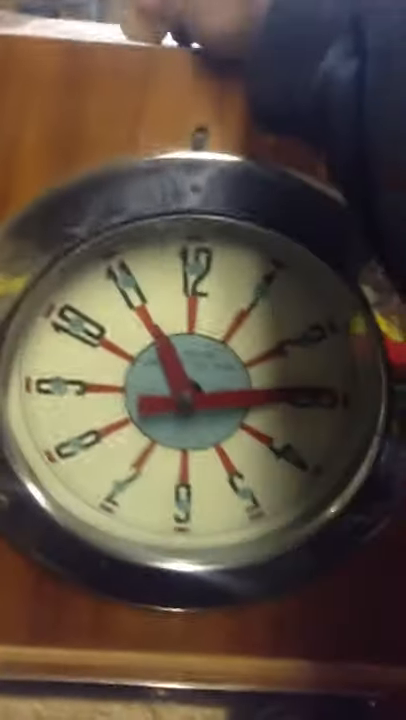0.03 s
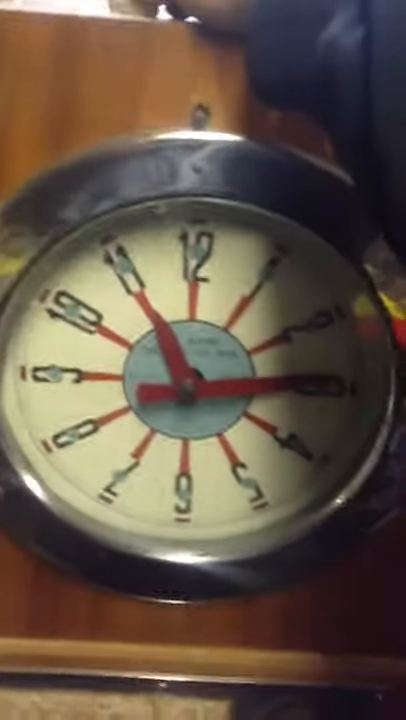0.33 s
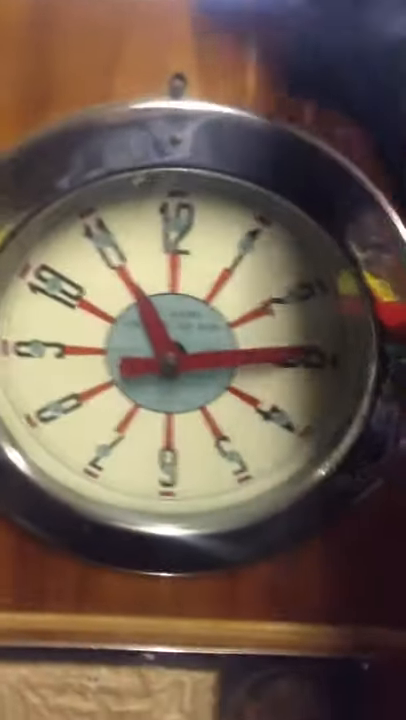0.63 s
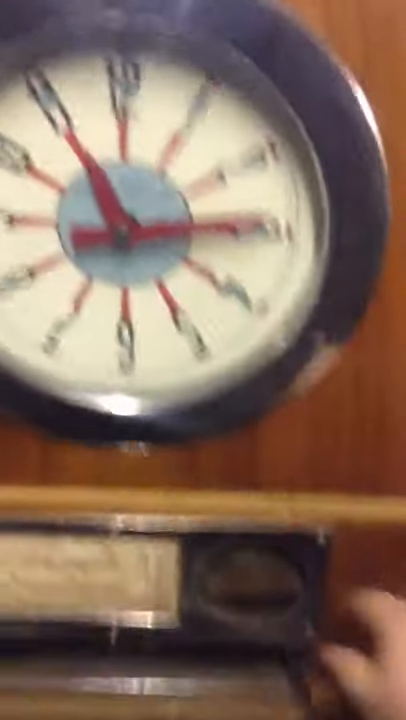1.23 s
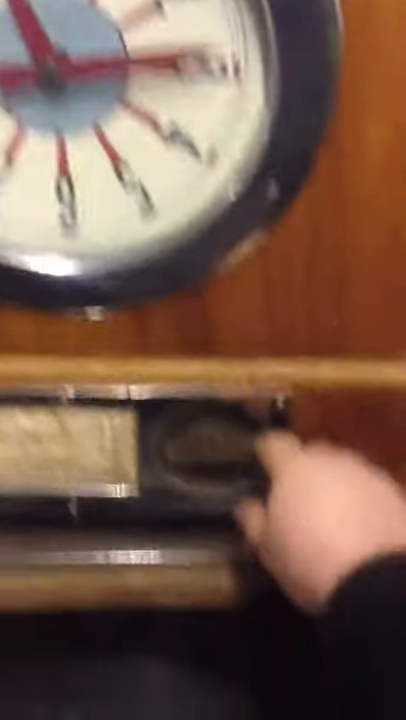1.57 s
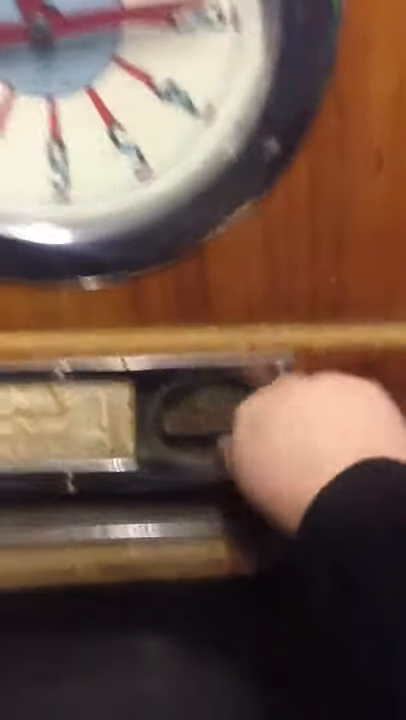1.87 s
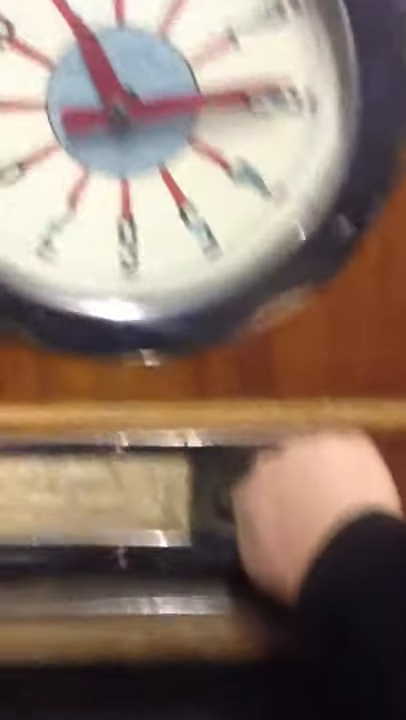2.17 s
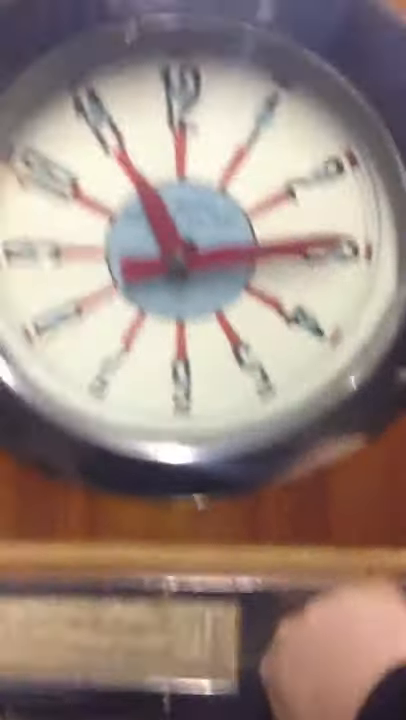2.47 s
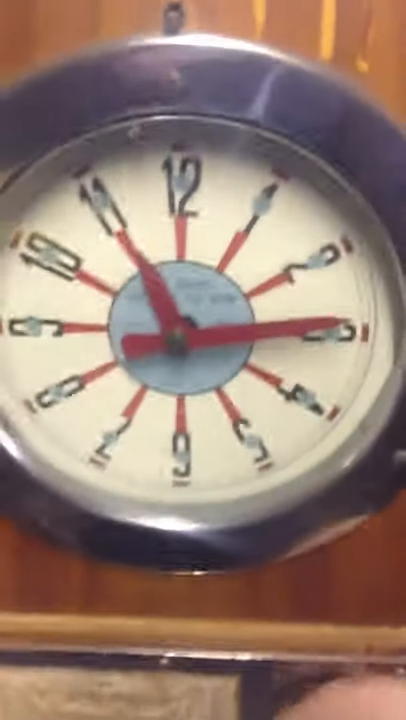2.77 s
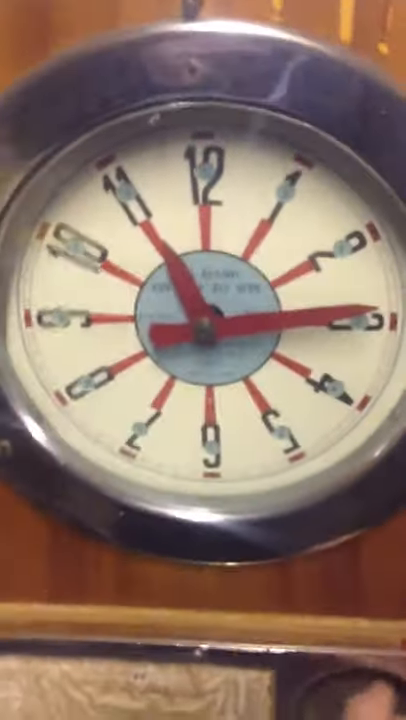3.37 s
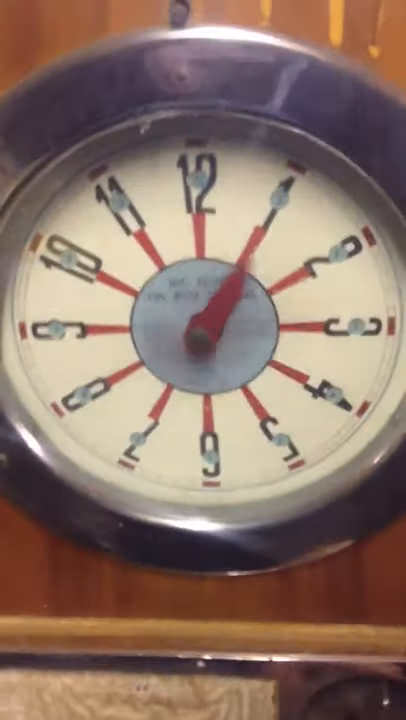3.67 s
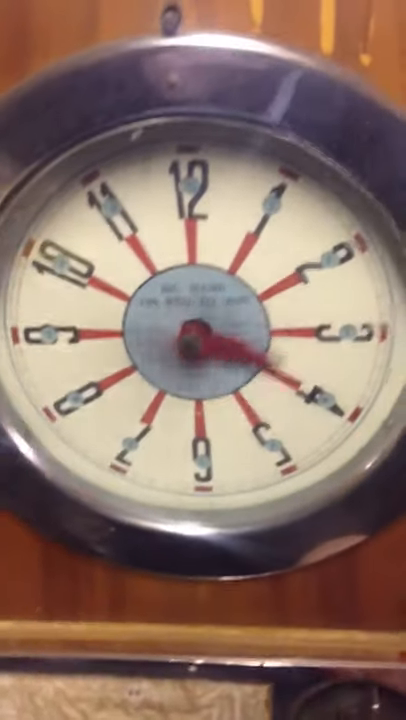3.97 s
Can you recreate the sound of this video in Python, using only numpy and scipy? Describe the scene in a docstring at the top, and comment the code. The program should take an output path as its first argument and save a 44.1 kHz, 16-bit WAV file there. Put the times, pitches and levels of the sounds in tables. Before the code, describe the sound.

Metallic clatter comes from a wooden coin machine, heard up close in a hard room. First a coin drops and scrapes down inside; then latches click, levers thump the cabinet and gears rattle with brief, thin squeals.

```python
"""A hard, quiet room, one microphone close to an old wooden coin machine with a clock face.
A sleeve brushes the case; a coin drops in, strikes the chute and slides down it. A knob is turned:
latches click, levers clunk in the cabinet, a spring rings and gears rattle the hand into a spin.
Rubbing metal squeals briefly, and the bare room prolongs the sounds."""
import sys
import numpy as np
from scipy import signal
from scipy.fft import rfft, irfft
from scipy.io import wavfile

SR = 44100
rng = np.random.default_rng(int(sys.argv[2]) if len(sys.argv) > 2 else 0)


def wav_record(signal):
    """Record a signal, one row per channel, as 16-bit PCM in the file named by sys.argv[1]."""
    frames = np.transpose(np.atleast_2d(signal))
    bounded = np.clip(frames, -1, 1)
    # unit amplitude maps onto the largest positive 16-bit level
    quanta = np.round(bounded * 32767).astype(np.int16)
    wavfile.write(sys.argv[1], SR, quanta)


N = 176400
T = np.arange(SR) / SR  # one second, the span of a single event
METAL_DIRECT, WOOD_DIRECT = 2.7, 7.1  # gain of the direct path to the microphone
COIN_CHATTER_S, LEVER_CHATTER_S = 0.0062, 0.0098  # decay of the rebounds after a contact
CABINET_T60_S, SPRING_T60_S, CHUTE_T60_S, WHEEL_T60_S = 0.56, 0.23, 0.36, 0.74
PEAKY_DB, PEAK_WIDTH_HZ = 2.5, 110  # the many small resonances of sheet metal


def amp(db):
    """Decibels to gain."""
    return 10 ** (np.asarray(db) / 20)


def unit(x):
    """Scales to energy 1."""
    return x / (np.linalg.norm(x) + 1e-20)


def unit_rms(x):
    """Scales to rms 1."""
    return unit(x) * np.sqrt(x.size)


def value_at(points, hz):
    """Interpolates a table on a log-frequency axis."""
    f, value = np.transpose(points)
    return np.interp(np.log(hz + 1), np.log(f + 1), value)


def add(mix, s, sound):
    """Mixes a sound in at s seconds."""
    part = mix[max(round(s * SR), 0):][:len(sound)]
    part += sound[:len(part)]


def through(x, response):
    """Convolves, keeping the length."""
    return signal.fftconvolve(x, response)[:len(x)]


def colour(spectrum, peaky_db=0, size=4096):
    """Minimum-phase filter of energy 1; peaky_db adds small random resonances to the spectrum."""
    hz = abs(np.fft.fftfreq(size, 1 / SR))
    peaks = np.interp(hz / PEAK_WIDTH_HZ, np.arange(size), rng.standard_normal(size))
    log_gain = np.log(amp(value_at(spectrum, hz) + peaky_db * peaks))
    response = np.exp(np.conj(signal.hilbert(log_gain)))
    return unit(np.fft.ifft(response).real)


def drift(n, hz):
    """Smooth random wander of rms 1, mostly slower than hz."""
    rolloff = (1 + (np.fft.rfftfreq(n, 1 / SR) / hz) ** 2) ** 2
    return unit_rms(irfft(rfft(rng.standard_normal(n)) / rolloff, n))


# reverberation of the room around the machine: f/Hz, t60/s
ROOM_DECAY = [(150, 0.53), (500, 0.42), (1500, 0.37), (3000, 0.4), (7000, 0.32), (14000, 0.35)]
def echoes(build_s=.02, first_density=.15):
    """Reflections in case and room: sparse at first, then dense, each band dying at its own speed."""
    density = np.clip(first_density * (1 + (T / build_s) ** 2), .01, 1)
    taps = rng.standard_normal(SR) * (rng.random(SR) < density) / np.sqrt(density)
    hz, t, bands = signal.stft(taps, SR, nperseg=256)
    decay = amp(-60 * t / value_at(ROOM_DECAY, hz)[:, None])
    return signal.istft(bands * decay, SR, nperseg=256)[1][:SR]


def modes(table, t60, rise_s, blur, blur_hz):
    """Dying partials, each made uneven by reflections."""
    out = np.zeros(SR)
    for hz, db in table:
        partial = np.exp(2j * np.pi * (hz * T + rng.random()))
        flutter = 1 + blur * (drift(SR, blur_hz) + 1j * drift(SR, blur_hz))
        out += amp(db) * (partial * flutter).real
    onset = 1 - np.exp(-(T / rise_s) ** 2)
    return out * onset * amp(-60 * T / t60)


def steel(table, t60):
    """A steel part rings with strongly fluttering modes."""
    return modes(table, t60, rise_s=0.0062, blur=0.56, blur_hz=40.3)


def settle(hold_s, tail_db):
    """Envelope of wood that shudders briefly, then leaves a weaker tail."""
    return amp(tail_db) + (1 - amp(tail_db)) * np.exp(-(T / hold_s) ** 2)


def strike(tone, chatter_s, direct, echo_shape=1, rebounds_per_s=500):
    """One contact and its quick rebounds, coloured by the part that is hit."""
    rebounds = 0.54 * rng.standard_normal(SR) * (rng.random(SR) < rebounds_per_s / SR)
    clicks = rebounds * np.exp(-T / chatter_s)
    clicks[0] = 1
    path = echoes() * echo_shape
    path[0] += direct
    return through(path, signal.fftconvolve(unit(clicks[:SR // 8]), tone))


def rub(curve, spectrum, per_s, spread_db, wet, ring=None):
    """Tiny uneven impacts under a level curve, heard in the room; they may set a part ringing."""
    impacts = rng.choice([-1, 1], N) * (rng.random(N) < per_s / SR)
    sizes = amp(spread_db * np.minimum(rng.exponential(1, N), 4))
    level_db = np.interp(np.arange(N) / SR, *np.transpose(curve), left=-120, right=-120)
    force = unit_rms(impacts * sizes) * amp(level_db)
    direct = through(force, colour(spectrum, PEAKY_DB))
    out = (direct + wet * through(direct, unit(echoes()))) / np.hypot(1, wet)
    return out if ring is None else out + through(force, ring)


# room tone at the microphone: f/Hz, relative level/dB
AIR_SPECTRUM = [(90, -19.5), (150, -2), (300, -4), (700, -13.5), (1700, -18), (2800, -25), (7500, -25.5),
                (10000, -36), (14500, -26.5)]
def air(level_db=-62.5):
    """The room's air rumbles low, with a faint hiss."""
    gain = amp(level_db + 0.4 * drift(N, 4.3))
    return gain * through(rng.standard_normal(N), colour(AIR_SPECTRUM))


# sleeve on the case, barely above the room tone: t/s, level/dB
SLEEVE_CURVE = [(0, -77), (.19, -65.5), (.3, -77.5), (1.9, -74.5), (2.1, -64), (2.3, -78)]
# cloth rustle: f/Hz, relative level/dB
SLEEVE_SPECTRUM = [(100, -19), (400, 1), (3200, -2), (4800, 0), (7500, -4.5), (10000, -17)]
def sleeve():
    """Cloth brushes the machine twice in a fine stream of tiny contacts."""
    return rub(SLEEVE_CURVE, SLEEVE_SPECTRUM, per_s=2500, spread_db=-2.5, wet=0.63)


# modes of the wooden cabinet: f/Hz, relative level/dB
CABINET_MODES = [(168, -22), (205, -3), (371, -19), (457, -13.5), (666, -34)]
def thump():
    """The cabinet's low modes swell and settle."""
    ring = modes(CABINET_MODES, CABINET_T60_S, rise_s=0.0078, blur=0.4, blur_hz=22.6)
    return settle(hold_s=0.027, tail_db=-11) * ring


# struck wood, heard close: f/Hz, relative level/dB
CLACK_SPECTRUM = [(110, -41.5), (190, 2.5), (280, -6.5), (390, 2), (620, -2.5), (900, -3), (1700, -12),
                  (3500, -28), (12000, -35.5)]
def clack(chatter_s):
    """A contact rattles the wooden panels, which quickly settle."""
    shudder = settle(hold_s=0.016, tail_db=-6.5)
    return strike(colour(CLACK_SPECTRUM), chatter_s, WOOD_DIRECT, shudder)


# latches and levers inside the case, and at 2.1 s a faint tick of a hand on the knob: t/s, thump level/dB,
# clack level/dB, metal level/dB
LEVER_BLOWS = [(.077, -77, -47.5, -72), (2.097, -73, -57, -69), (2.702, -38, -43.5, -44.5),
               (2.812, -34.5, -49, -46.5), (2.885, -26, -32.5, -30.5), (2.957, -26.5, -39.5, -79),
               (3.107, -47, -46.5, -47), (3.158, -25, -25, -33), (3.165, -20, -20, -25.5),
               (3.18, -25, -27, -25.5), (3.277, -22.5, -21, -30), (3.294, -28, -20, -23),
               (3.3575, -33, -17, -27.5), (3.371, -31, -18, -24.5), (3.391, -41, -18.5, -22),
               (3.502, -5.5, -28, -21.5), (3.566, -10.5, -24, -18), (3.646, -20, -28, -24.5),
               (3.857, -38, -26, -31), (3.87, -31, -33, -36)]
# struck steel linkage: f/Hz, relative level/dB
METAL_SPECTRUM = [(150, -37), (1000, -15), (2200, -0.5), (3300, -5.5), (4600, -1), (8200, -2), (9700, -17),
                  (13000, -13), (15500, -28)]
def levers():
    """Each blow thumps the cabinet, clacks its panels and jangles a different steel part."""
    out = np.zeros(N)
    for s, thump_db, clack_db, metal_db in LEVER_BLOWS:
        add(out, s, amp(thump_db) * thump())
        add(out, s, amp(clack_db) * clack(LEVER_CHATTER_S))
        jangle = strike(colour(METAL_SPECTRUM, PEAKY_DB), LEVER_CHATTER_S, METAL_DIRECT)
        add(out, s, amp(metal_db) * jangle)
    return out


# clunks at the front of the machine: t/s, level/dB
PANEL_CLUNKS = [(0.078, -43), (2.958, -37), (3.067, -50), (3.164, -15.5), (3.371, -17.5), (3.511, -17),
                (3.569, -15), (3.664, -17.5)]
# modes of the wooden front panel: f/Hz, relative level/dB
PANEL_MODES = [(360, -2), (450, 1.5), (900, -12.5)]
def panel():
    """The front panel answers blows with a short, hollow note."""
    out = np.zeros(N)
    for s, db in PANEL_CLUNKS:
        ring = modes(PANEL_MODES, CABINET_T60_S, rise_s=0.0032, blur=0.41, blur_hz=50.4)
        add(out, s, amp(db) * settle(hold_s=0.013, tail_db=-27) * ring)
    return out


# squeals from the mechanism, more direct sound than room: t/s, length/s, f/Hz, level/dB
METAL_SQUEALS = [(.165, 0.093, 4620, -66), (1.089, 0.013, 1827, -29.5), (1.162, 0.17, 8740, -38.5),
                 (3.384, 0.13, 8690, -26.5), (3.66, 0.13, 7710, -22.5)]
def squeals(waver_hz=16, skew=0.46, wet=0.48):
    """Metal sliding on metal sings on one wavering pitch, swelling quickly and tapering off."""
    out = np.zeros(N)
    for s, length, hz, db in METAL_SQUEALS:
        swell = np.sin(np.pi * np.minimum(T / length, 1) ** skew)
        pitch = hz + waver_hz * drift(SR, 98)
        add(out, s, amp(db) * swell * np.sin(2 * np.pi * np.cumsum(pitch) / SR))
    return out + wet * through(out, unit(echoes()))


# coin strikes inside the case: t/s, clink level/dB, knock level/dB
COIN_STRIKES = [(.518, -39.5, -53), (0.547, -26, -31), (0.7523, -24.5, -41), (0.784, -29, -52),
                (.803, -63, -32.5), (0.933, -30.5, -30.5), (1.101, -35, -39.5), (1.259, -46.5, -41),
                (1.348, -48, -41.5)]
# coin on steel: f/Hz, relative level/dB
CLINK_SPECTRUM = [(100, -26.5), (500, -7), (1900, -10), (2700, 4.5), (4100, 1), (7800, 2), (9700, -11),
                  (15500, -18)]
# modes of the steel chute: f/Hz, relative level/dB
CHUTE_MODES = [(1330, -20.5), (1916, -26), (2293, -13), (2560, -10.5), (2720, -12.5), (2960, -11),
               (3460, -14), (5160, -17), (6465, -17), (7235, -17)]
# coin sliding down the chute: t/s, level/dB
SLIDE_CURVE = [(.76, -48), (.81, -42), (.915, -39.5), (.937, -26.5), (.975, -54), (1.03, -36.5),
               (1.165, -38.5), (1.21, -45.5), (1.25, -53), (1.3, -41), (1.325, -48), (1.36, -37.5),
               (1.41, -50), (1.45, -71)]
# scrape of the coin: f/Hz, relative level/dB
SLIDE_SPECTRUM = [(110, -25), (190, 3), (600, -7.5), (1600, -2), (3000, 3), (7800, 3), (9700, -6),
                  (15500, -13)]
def coin():
    """The coin hits the chute, knocking the case, and scrapes on down, keeping the steel ringing."""
    chute_ring = 0.12 * unit(steel(CHUTE_MODES, CHUTE_T60_S))
    out = rub(SLIDE_CURVE, SLIDE_SPECTRUM, per_s=800, spread_db=5.0, wet=2.2, ring=chute_ring)
    for s, clink_db, knock_db in COIN_STRIKES:
        clink = strike(colour(CLINK_SPECTRUM, peaky_db=1.7), COIN_CHATTER_S, METAL_DIRECT)
        add(out, s, amp(clink_db) * (clink + steel(CHUTE_MODES, CHUTE_T60_S)))
        knock = (clack(COIN_CHATTER_S) + thump()) / 2
        add(out, s, amp(knock_db) * knock)
    return out


# blows that reach the spring: t/s, level/dB
SPRING_BLOWS = [(3.172, -22.5), (3.296, -25), (3.332, -27), (3.376, -19.5), (3.405, -22.5), (3.873, -31)]
# modes of the steel spring: f/Hz, relative level/dB
SPRING_MODES = [(2642, -11), (4310, 1.5), (4337, -8), (5114, -7), (6108, -17), (8120, -15), (8690, -7)]
def spring():
    """The struck spring rings high, two close modes beating."""
    out = np.zeros(N)
    for s, db in SPRING_BLOWS:
        ring = modes(SPRING_MODES, SPRING_T60_S, rise_s=0.0064, blur=0.3, blur_hz=31)
        add(out, s, amp(db) * ring)
    return out


# gear train behind the clock face, heard mostly by reflection: t/s, level/dB
GEAR_CURVE = [(3.27, -58), (3.31, -42), (3.36, -56), (3.395, -18.5), (3.445, -23.5), (3.485, -13),
              (3.51, -16.5), (3.578, -20), (3.615, -31), (3.675, -25.5), (3.72, -46), (3.8, -43), (4, -61)]
# rattle of the teeth: f/Hz, relative level/dB
GEAR_SPECTRUM = [(105, -24), (200, 4.5), (450, 8), (1200, -1), (3300, -5.5), (4700, -1), (7600, 1),
                 (9700, -7.5), (15500, -13.5)]
# modes of the gear wheels: f/Hz, relative level/dB
WHEEL_MODES = [(5114, -3), (6108, -2), (6920, -1), (7762, 1)]
def gears():
    """The running gears rattle in tiny impacts that set their wheels ringing."""
    wheel_ring = 0.23 * unit(steel(WHEEL_MODES, WHEEL_T60_S))
    return rub(GEAR_CURVE, GEAR_SPECTRUM, per_s=860, spread_db=2.5, wet=2.2, ring=wheel_ring)


def scene():
    """Room, sleeve, mechanism and coin as they reach the microphone, in mono."""
    return (air() + sleeve() + levers() + panel() + squeals() + coin() + spring() + gears())[None]


def record(dry, low_cut_hz=70, ceiling=.8, band_limit_hz=15700):
    """Deep bass is cut, the loudest knocks are gently rounded off, and the treble is limited."""
    thin = signal.sosfilt(signal.butter(2, low_cut_hz, "highpass", fs=SR, output="sos"), dry)
    softened = thin / (1 + (thin / ceiling) ** 4) ** .25
    lowpass = signal.firwin(255, band_limit_hz, window=("kaiser", 8), fs=SR)
    return signal.oaconvolve(softened, lowpass[None], "same")


dry = scene()
out = record(dry)
wav_record(out)
```